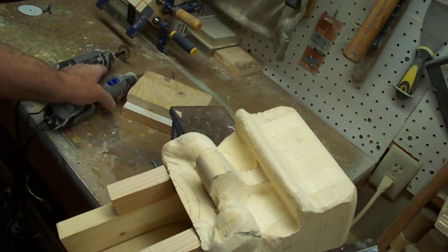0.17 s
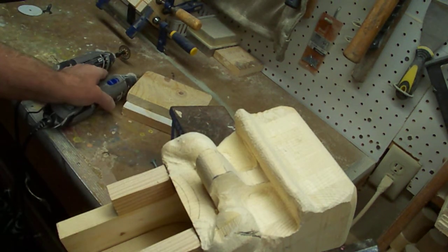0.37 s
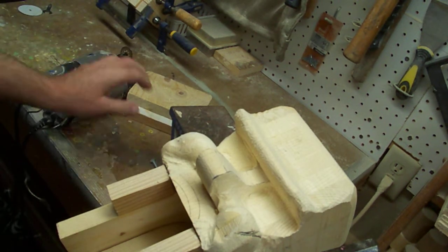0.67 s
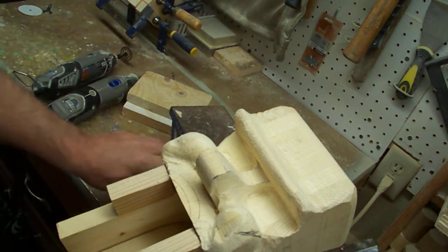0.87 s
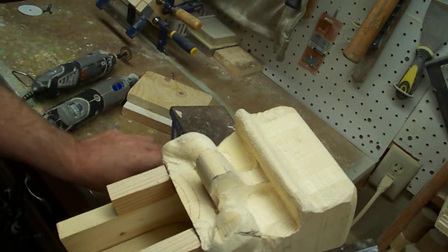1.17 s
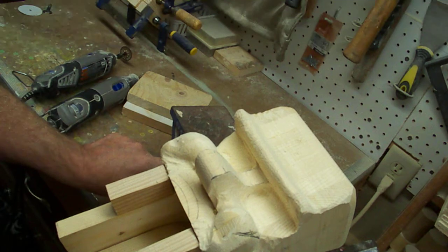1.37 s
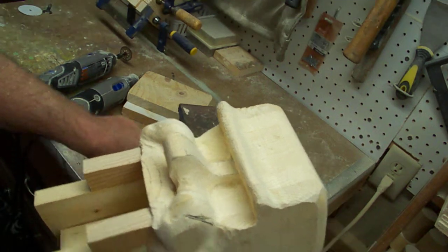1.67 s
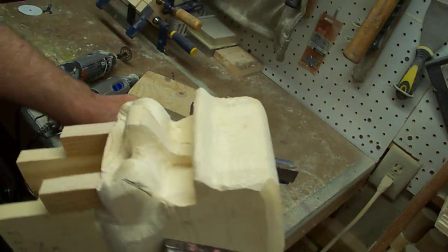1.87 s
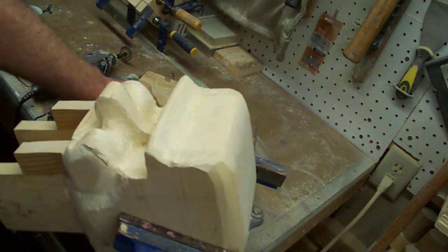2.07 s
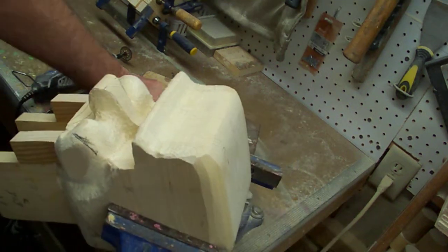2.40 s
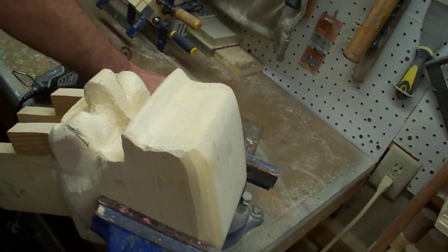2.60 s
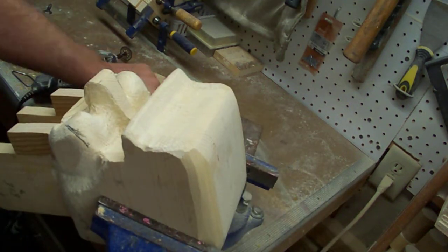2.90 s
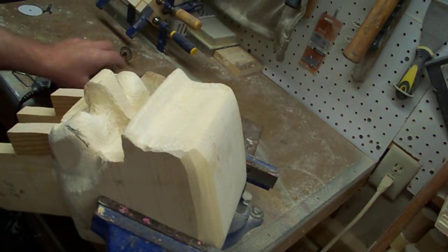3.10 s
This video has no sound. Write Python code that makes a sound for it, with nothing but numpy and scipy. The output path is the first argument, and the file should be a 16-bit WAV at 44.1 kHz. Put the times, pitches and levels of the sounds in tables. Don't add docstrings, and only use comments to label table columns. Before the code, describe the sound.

Close in a small, fairly dry workshop, a small motor tool spins down with a rattly plastic buzz, knocks against the bench early, then slows to nothing over soft bench thumps, with a faint cricket at the end.

```python
import sys
import numpy as np
from scipy import signal
from scipy.fft import rfft, irfft, next_fast_len
from scipy.io import wavfile
from scipy.ndimage import uniform_filter1d

SR = 44100
rng = np.random.default_rng(int(sys.argv[2]) if len(sys.argv) > 2 else 0)


def level_to_linear(level):
    exponent = np.asarray(level, float) / 20
    return 10 ** exponent


def store_wav(level_fs):
    pcm = np.round(np.clip(np.atleast_2d(level_fs), -1, 1) * 32767)
    wavfile.write(sys.argv[1], SR, pcm.T.astype(np.int16))


N = 143325
LANDS_S = 0.463

# t/s, f/Hz
SHAFT_SPEED = [(0, 345), (.25, 312.2), (.45, 286.3), (.55, 272.7), (.75, 247), (.95, 221.2), (1.05, 208.7),
               (1.25, 185.4), (1.5, 158.2), (1.75, 131.2), (2, 104.7), (2.4, 62.6), (2.6, 41.4), (2.8, 20),
               (2.95, 6)]
# t/s, housing level/dB, rattle over shaft orders/dB, imbalance hum/dB
COAST_LEVELS = [(0, -18.5, 5.5, -39), (.35, -17.5, 2, -42.5), (.375, -19.5, 1.5, -36.5),
                (.455, -17.5, -6.5, -38), (.47, -18.5, 7, -36), (.6, -18, -3.5, -42), (.85, -22, -2.5, -43),
                (.96, -24.5, -2.5, -51), (1.1, -25.5, 2.5, -44), (1.35, -29, 3, -43.5),
                (1.55, -33.5, 1, -42), (1.7, -34, 3.5, -36), (1.74, -37.5, 3, -45.5),
                (2.1, -41.5, 0.5, -59), (2.3, -42.5, 24, -80), (2.55, -44.5, 10.5, -84),
                (2.8, -52, 13.5, -94), (2.92, -62, 10, -98)]
# t/s, commutator whine/dB, fourth slot harmonic/dB, other slot tones/dB
MOTOR_LEVELS = [(0, -48, -55, -43), (.15, -35, -55, -44), (.25, -26, -55, -45), (.45, -22, -55, -51),
                (.55, -25, -55, -50), (.65, -31, -55, -45), (.75, -37, -55, -40), (.85, -35, -53, -40),
                (1.05, -38, -47, -40), (1.15, -43, -51, -42), (1.65, -42, -47, -49), (1.77, -48, -47, -52),
                (1.95, -47, -48, -54), (2.12, -49, -55, -55), (2.35, -55, -49, -53), (2.5, -66, -60, -55),
                (2.68, -57, -62, -62), (2.8, -85, -80, -85)]
# multiple of slot rate, level/dB
SLOT_HARMONICS = [(1, -10), (1.5, -4), (2, -7), (5, -5), (6, -6), (7, -11), (8, -15)]
# f/Hz, width/Hz, in the hand/dB, on the bench/dB, when slow/dB
HOUSING_MODES = [(838, 99, -10.5, -3.5, 0), (1046, 29.6, 6.5, 5, 3), (1385, 69.5, 2, 1.5, -12),
                 (1852, 65, 4.5, 1.5, -31), (2110, 143, -4, -9.5, 3), (2362, 90, 1.5, 3.5, 1.5),
                 (2938, 490, -1.5, -2, -3), (3715, 387, 1.5, -3.5, 0.5), (4650, 49, -21.5, -29.5, -12),
                 (5223, 100, -7, -23, -10), (6633, 760, 1.5, -2, 8), (7480, 100, -15, -10, -7.5),
                 (1208, 150, -9.5, -3.5, -19), (3425, 36, 0.5, -19, -28)]
# f/Hz, level/dB
SHELL_RADIATION = [(200, -16), (500, -7), (800, -4.5), (1500, 0), (3000, -2), (5000, 2), (7500, -13.5)]
# t/s, peak level/dB
HOUSING_TAPS = [(.4655, -6), (.4815, -5), (.489, -11), (.4975, -5), (.502, -10), (.511, -10), (.523, -10),
                (.711, -12), (1.345, -26), (1.663, -30), (1.985, -30)]
# t/s, level/dB, f/Hz, t60/s
BENCH_THUMPS = [(0.098, -44, 61, 0.22), (0.372, -45, 210, 0.087), (0.48, -23, 128, 0.11),
                (1.192, -37.5, 81, 0.14), (1.1, -35, 135, 0.3), (1.345, -27.5, 143, 0.098),
                (1.362, -30, 71, 0.27), (1.35, -30.5, 37, 0.76), (1.43, -42, 25, 0.25),
                (1.8, -30.5, 112, 0.19), (1.62, -30.5, 25, .4), (2.7, -37, 28, 0.44),
                (1.82, -34, 105, 0.24), (1.4, -39.5, 30, 0.33), (2.85, -44.5, 21, .6),
                (1.939, -27.5, 120, 0.12), (1.951, -30, 38, .4), (2.471, -32, 31, 0.18),
                (2.549, -35.5, 48, 0.26), (2.85, -40.5, 19.3, 0.81), (3.4, -46.5, 89, .2),
                (2.585, -35, 130, 0.098)]
# t/s, level/dB
VISE_SWIVEL = [(0, -51.5), (.55, -49), (.95, -55.5), (1.1, -47), (1.3, -44.5), (1.45, -43.5), (1.57, -46),
               (1.7, -38), (2.0, -40), (2.25, -46.5), (2.37, -52.5), (2.5, -44.5), (2.6, -48),
               (2.73, -58.5), (3.1, -55.5), (3.25, -53)]
# f/Hz, level/dB
RUMBLE_COLOUR = [(20, -4), (45, -8), (100, -7.5), (170, -14), (260, -30), (500, -35)]
CHIRP_STARTS = [2.787, 2.835, 2.889, 2.948]
# t into the chirp/s, length/s, level/dB, f offset/Hz
CHIRP_SYLLABLES = [
    (0, 0.012, -6, 90),
    (0.01, 0.017, 0, -20),
    (0.025, .024, -5, 62),
]
# f/Hz, level/dB
ROOM_TONE = [(100, -2.5), (200, -18), (300, -33.5), (400, -13), (1000, -18), (3200, -21.5), (6300, -20),
             (8000, -60)]
# f/Hz, left minus right/dB
PORT_BALANCE = [(60, 0), (1000, 0), (1600, 2), (2400, 4), (4000, 0), (6000, -1), (7400, -8)]


def tool():
    t = np.arange(N) / SR
    speed = uniform_filter1d(curve(SHAFT_SPEED, column=1), SR // 20, mode="nearest")
    turn = np.cumsum(speed) / SR
    running = np.clip((2.95 - t) / 0.039, 0, 1)
    body = shell(turn) * level_to_linear(curve(COAST_LEVELS, column=1))
    return (body + motor(turn) + imbalance(turn)) * running


def shell(turn):
    orders = np.arange(2, 31)
    order_db = -3 * np.log2(orders) - 8 * (orders == 2)
    lines = tones(orders, order_db, turn, wander_db=3.5)
    gate = 1 + 0.38 * np.cos(2 * np.pi * turn)
    flicker = level_to_linear(1 * walk(59.94)[0])
    rattle = rng.standard_normal(N) * gate * flicker
    share = level_to_linear(curve(COAST_LEVELS, column=2))
    return (steady(housing(lines)) + share * steady(housing(rattle))) / np.sqrt(1 + share ** 2)


def motor(turn):
    bars, slots, fourth_slot = 24, 8, 32
    multiple, db = np.array(SLOT_HARMONICS).T
    slot_orders = slots * np.round(2 * multiple) / 2
    slot_tones = level_to_linear(curve(MOTOR_LEVELS, column=3)) * tones(slot_orders, db, turn, wander_db=7.5)
    whine = level_to_linear(curve(MOTOR_LEVELS, column=1)) * tones([bars], [0], turn, wander_db=2.5)
    slot_line = level_to_linear(curve(MOTOR_LEVELS, column=2)) * tones([fourth_slot], [0], turn, wander_db=2.5)
    return whine + slot_line + ring(slot_tones, column=4)


def imbalance(turn):
    t = np.arange(N) / SR
    hum = level_to_linear(curve(COAST_LEVELS, column=3)) * tones([1], [0], turn, wander_db=1.5)
    from_s, to_s, fade_s = 0.52, 1.25, 0.05
    cage_window = np.clip(np.minimum(t - from_s, to_s - t) / fade_s, 0, 1)
    return hum + level_to_linear(-54) * cage_window * tones([0.735], [0], turn, wander_db=2.0)


def tones(orders, db, turn, wander_db):
    k = np.array(orders)[:, None]
    start = rng.standard_normal((len(k), 1))
    size = level_to_linear(np.array(db)[:, None] + wander_db * walk(14, count=len(k)))
    return np.sqrt(2) * np.sum(size * np.sin(2 * np.pi * (k * turn + start)), axis=0)


def housing(x):
    t = np.arange(N) / SR
    down = np.clip((t - LANDS_S) * 200, 0, 1)
    slow = np.clip((t - 1.01) / 1, 0, 1)
    in_hand, on_bench, slowing = ring(x, column=2), ring(x, column=3), ring(x, column=4)
    return (1 - down) * in_hand + (down - slow) * on_bench + slow * slowing


def ring(x, column):
    def response(f):
        total = level_to_linear(-12)
        for k, row in enumerate(HOUSING_MODES):
            centre_hz, width_hz = row[0], row[1]
            mode = level_to_linear(row[column]) / (1 + 2j * (f - centre_hz) / width_hz)
            total = total + (-1) ** k * mode
        return colour(SHELL_RADIATION, f) * total
    return shape(x, response)


def taps():
    hits = np.zeros(N)
    for s, db in HOUSING_TAPS:
        hits[int(s * SR)] = level_to_linear(db)
    knock = ring(hits, column=3)
    knock = knock * np.max(hits) / np.max(np.abs(knock))
    u = np.arange(N) / SR - HOUSING_TAPS[0][0]
    fade = (u > 0) * np.exp(-np.maximum(u, 0) / 0.098)
    chatter = unit(ring(rng.standard_normal(N), column=3)) * level_to_linear(-17) * fade
    return knock + chatter


def bench():
    t = np.arange(N) / SR
    noise = rng.standard_normal((2, N))
    grit = unit(shape(noise[0], lambda f: 1 / (1 + (f / 450) ** 2)))
    rumble = unit(shape(noise[1], lambda f: colour(RUMBLE_COLOUR, f)))
    out = level_to_linear(curve(VISE_SWIVEL, column=1) + 2.75 * walk(24.94)[0]) * rumble
    rise_s, grit_db, gritty_hz = 0.004, -7, 125
    for s, db, hz, t60 in BENCH_THUMPS:
        u = np.maximum(t - s, 0)
        fade = (1 - np.exp(-u / rise_s)) * np.exp(-np.log(1000) * u / t60)
        grit_gain = level_to_linear(grit_db) * (hz / gritty_hz) ** 2
        out = out + level_to_linear(db) * fade * (np.sin(2 * np.pi * hz * u) + grit_gain * fade * grit)
    return out + level_to_linear(-19) * np.roll(out, SR // 50) * np.array([[1], [-1]])


def cricket():
    t = np.arange(N) / SR
    out = 0
    pitch_hz, level_db = 4400, -49
    for start in CHIRP_STARTS:
        for s, length, db, off_hz in CHIRP_SYLLABLES:
            u = np.clip((t - start - s) / length, 0, 1)
            swell = level_to_linear(level_db + db) * np.sin(np.pi * u)
            out = out + swell * np.sin(2 * np.pi * (pitch_hz + off_hz) * t)
    return out


def shop():
    noise = rng.standard_normal((4, N))
    air = shape(noise[:2], lambda f: colour(ROOM_TONE, f) * (f > 100))
    centre_hz, width_hz = 5050, 420
    chorus = shape(noise[2:], lambda f: np.exp(-((f - centre_hz) / width_hz) ** 2))
    mid, side = level_to_linear(-60) * unit(air) + level_to_linear(-68 + 2.0 * walk(30)) * unit(chorus)
    return mid + level_to_linear(-0.5) * side * np.array([[1], [-1]])


def shape(x, response):
    size = next_fast_len(N + SR // 2)
    f = np.arange(size // 2 + 1) * SR / size + 1
    return irfft(rfft(x, size) * response(f), size)[..., :N]


def colour(table, f):
    hz, db = np.array(table, float).T
    return level_to_linear(np.interp(np.log(f), np.log(hz + 1), db))


def unit(x):
    return x / np.sqrt(np.mean(x ** 2))


def steady(x):
    return x / np.sqrt(uniform_filter1d(x ** 2, SR // 6, mode="reflect"))


def walk(rate, count=1):
    k = int(SR / rate)
    steps = np.repeat(rng.standard_normal((count, N // 400 + 2)), k, axis=1)[:, :N]
    return 1.29 * uniform_filter1d(uniform_filter1d(steps, k), k)


def curve(table, column):
    rows = np.array(table, float)
    return np.interp(np.arange(N) / SR, rows[:, 0], rows[:, column])


def at_ports(near):
    side = np.array([[0.5], [-0.5]])
    lag_s = 6.8e-5
    return shape(near, lambda f: colour(PORT_BALANCE, f) ** side * np.exp(-2j * np.pi * f * lag_s * side))


def room(near):
    t60_s, delay_s = 0.16, 0.003
    u = np.arange(SR // 2) / SR
    tail = rng.standard_normal((2, len(u))) * np.exp(-np.log(1000) * u / t60_s) * (u > delay_s)
    tail = tail / np.sqrt(np.sum(tail ** 2) / 2)
    tail = shape(np.pad(tail, ((0, 0), (0, N))), lambda f: f / (f + 400))
    return level_to_linear(-4) * signal.fftconvolve(near[None], tail[:, :len(u)], axes=1)[:, :N]


def scene():
    near = tool() + taps()
    left_right = level_to_linear(np.array([[1.0], [-1.0]]))
    return at_ports(near) + room(near) + bench() + cricket() * left_right + shop()


def low_pass(x):
    return signal.sosfilt(signal.butter(12, 9040, fs=SR, output="sos"), x)


def record(dry):
    rate_hz, top_hz = 16000, 9100
    kept = shape(dry, lambda f: 1 / np.sqrt(1 + (f / 7800) ** 60))
    top = shape(dry, lambda f: (f < top_hz) / np.sqrt(1 + (7750 / f) ** 50))
    mirror = 2 * top * np.cos(2 * np.pi * rate_hz * np.arange(N) / SR)
    mix = shape(kept + level_to_linear(-9) * mirror, lambda f: 1.0 * (f < top_hz))
    return low_pass(mix)


dry = scene()
out = record(dry)
store_wav(out)
```